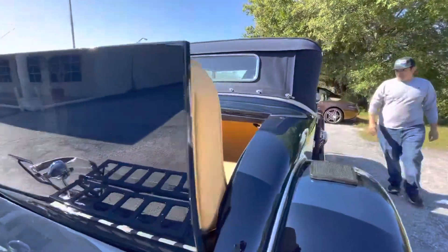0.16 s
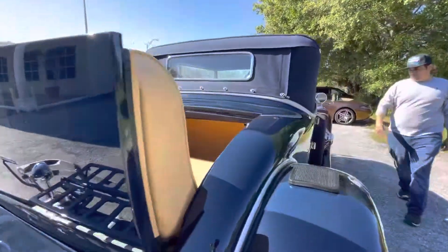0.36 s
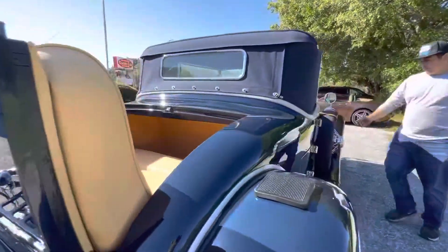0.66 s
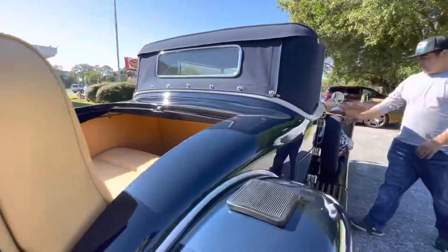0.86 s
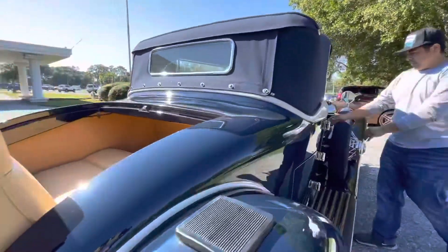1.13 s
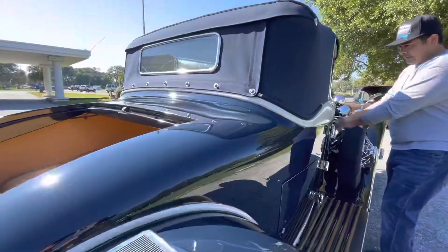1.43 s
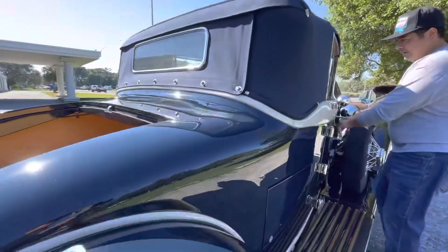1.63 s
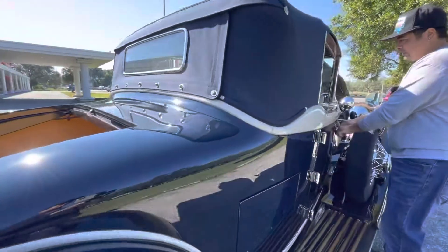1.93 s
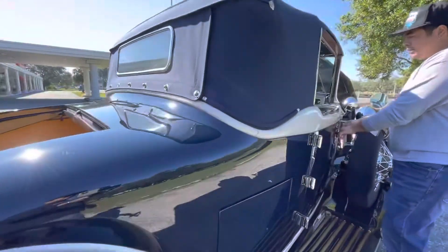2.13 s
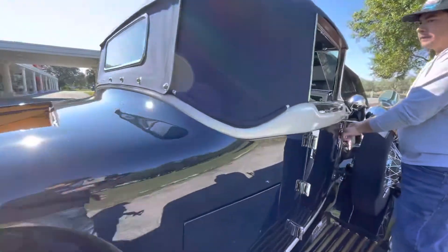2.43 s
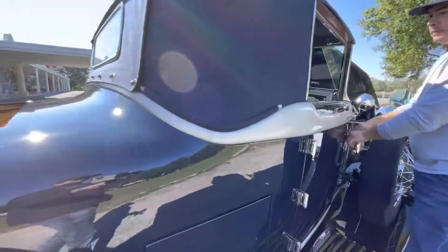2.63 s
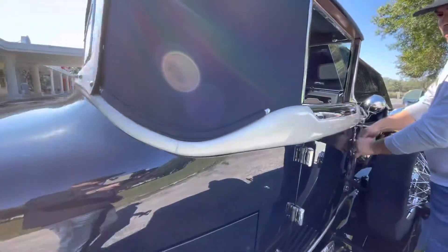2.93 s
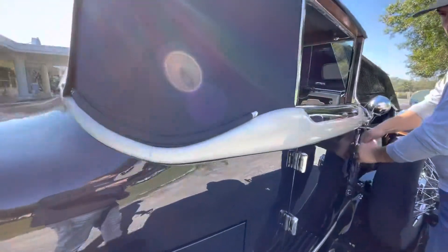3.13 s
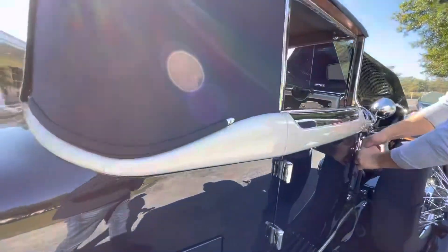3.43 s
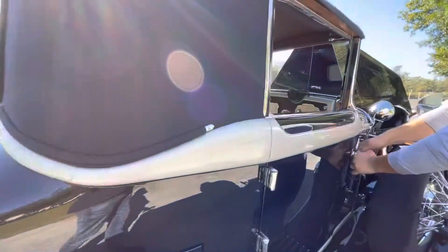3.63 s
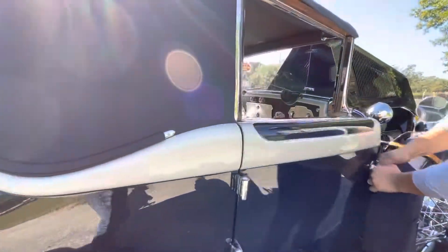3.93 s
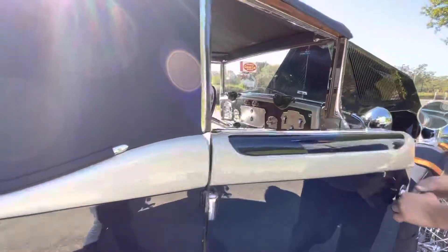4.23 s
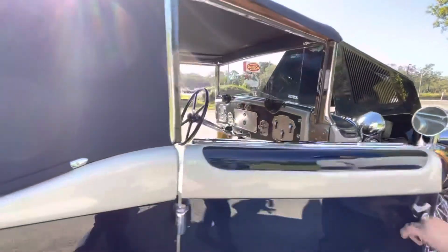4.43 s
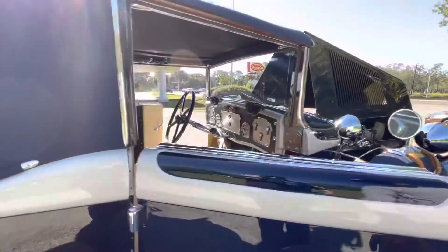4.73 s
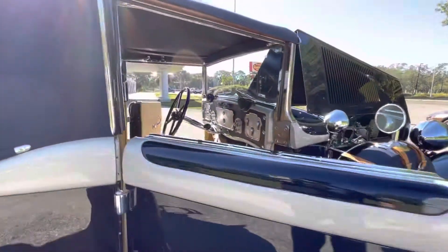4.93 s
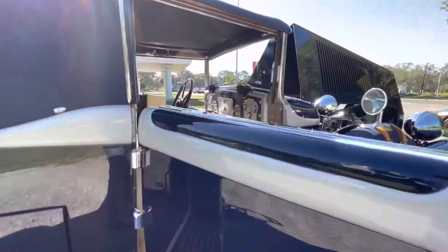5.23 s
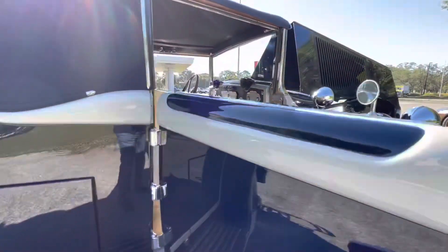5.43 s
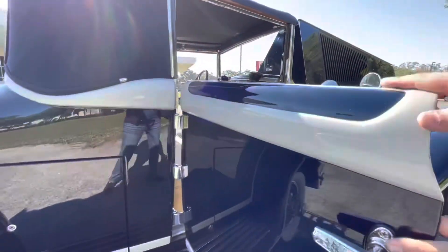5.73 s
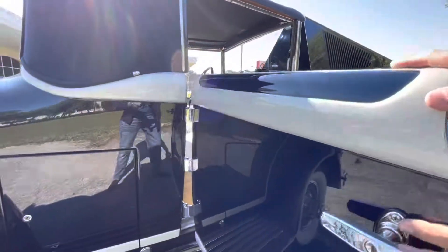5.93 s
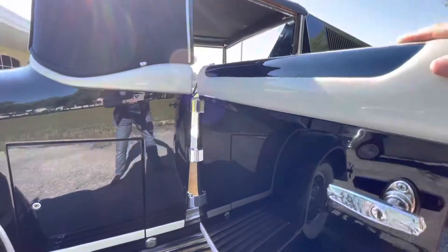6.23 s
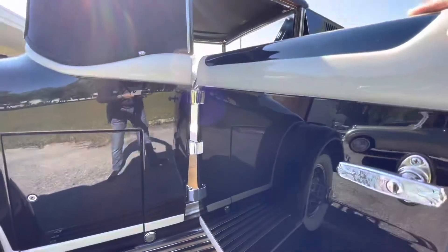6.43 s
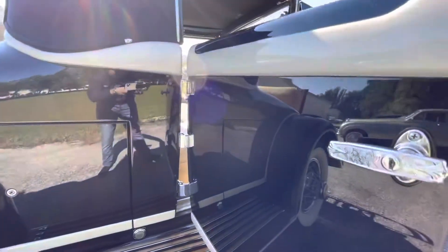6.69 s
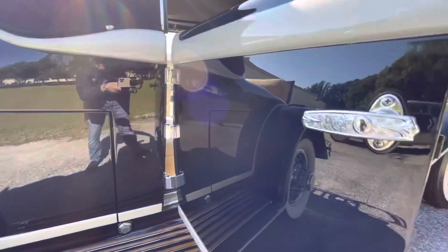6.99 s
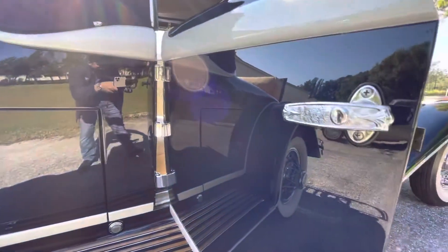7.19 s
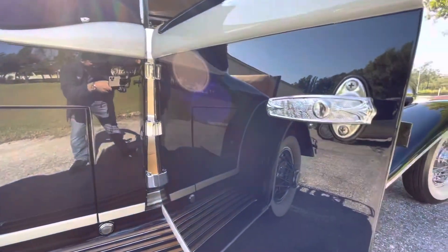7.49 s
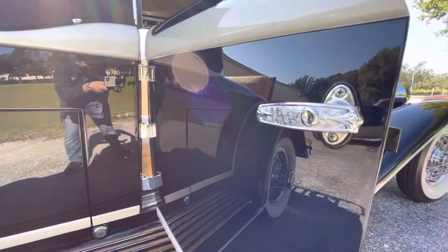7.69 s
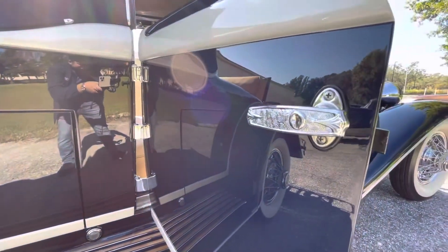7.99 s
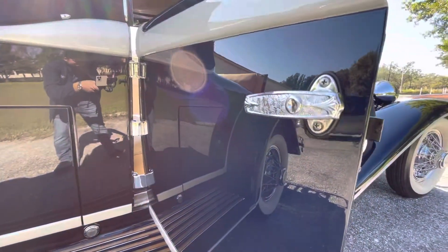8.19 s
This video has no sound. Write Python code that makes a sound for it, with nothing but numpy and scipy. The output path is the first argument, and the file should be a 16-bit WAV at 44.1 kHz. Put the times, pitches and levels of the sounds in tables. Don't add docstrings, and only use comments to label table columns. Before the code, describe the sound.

Beside a parked old car, droning engines beat slowly as sharp latch clicks, dull door knocks and gritty scuffs happen close by.

```python
import sys
import numpy as np
from scipy import signal
from scipy.fft import rfft, irfft, next_fast_len
from scipy.io import wavfile

SR = 44100
rng = np.random.default_rng(int(sys.argv[2]) if len(sys.argv) > 2 else 0)


def store_pcm(level_fs):
    pcm = np.round(np.clip(level_fs, -1, 1) * 32767).astype(np.int16)
    wavfile.write(sys.argv[1], SR, np.atleast_2d(pcm).T)


def how_loud(loudness_db):
    steps = np.asarray(loudness_db, float) / 20
    return 10 ** steps


N = 368235
PORT_LAG_S = .00034

# f/Hz, level/dB per Hz
SHEEN = [(8800, -14), (9500, -11), (10200, -4), (10800, 0), (11350, 0), (11900, -12), (12400, -24),
         (13300, -54), (16200, -70)]


def rms_one(x):
    return x / np.sqrt(np.mean(x ** 2) + 1e-20)


def in_time(rows):
    s, *columns = np.transpose(rows)
    return [np.interp(np.arange(N) / SR, s, c) for c in columns]


def drift(rate):
    r = np.exp(-80 * np.pi * rate / SR)
    draws = rng.standard_normal(N // 40 + 2002)
    slow = signal.lfilter([1], [1, -2 * r, r * r], draws)[2000:]
    return np.interp(np.arange(N) / 40, np.arange(len(slow)), rms_one(slow - slow.mean()))


def colour(x, spectrum):
    size = next_fast_len(N)
    hz, db = np.transpose(spectrum)
    log_hz = np.log(np.fft.rfftfreq(size, 1 / SR) + 1)
    gain = how_loud(np.interp(log_hz, np.log(hz), db, left=-120, right=-120))
    return irfft(rfft(x, size) * gain, size)[..., :N]


def noise(spectrum):
    return rms_one(colour(rng.standard_normal(N), spectrum))


def band_pass(x, low_hz, high_hz):
    return signal.sosfilt(signal.butter(2, [low_hz, high_hz], "band", fs=SR, output="sos"), x)


def dulled(x):
    return signal.sosfilt(signal.butter(8, 9600, fs=SR, output="sos"), x)


def ports(x, lag_s=PORT_LAG_S):
    size = next_fast_len(N + 64)
    delay = np.exp(-2j * np.pi * np.fft.rfftfreq(size, 1 / SR) * lag_s)
    late = irfft(rfft(x, size) * delay, size)[:N]
    return np.array([late, x])


def field(source, diffuse):
    share = np.clip(diffuse, 0, 1)
    return np.sqrt(1 - share) * ports(source()) + np.sqrt(share) * np.array([source(), source()])


def ring(clicks, hz, t60):
    r, w = how_loud(-60 / (t60 * SR)), 2 * np.pi * hz / SR
    return signal.lfilter([0, np.sin(w)], [1, -2 * r * np.cos(w), r * r], clicks + 1e-18)


def strike(blows, modes):
    s, db = np.transpose(blows)
    out = np.zeros(N)
    for hz, mode_db, t60 in modes:
        clicks = np.zeros(N)
        strength = how_loud(db + mode_db + rng.normal(0, 2, len(s)))
        clicks[(s * SR).astype(int)] = strength * rng.choice([-1, 1], len(s))
        out += ring(clicks, hz, t60)
    return out


def engine(rows, overtones=(), ease_db=0, flutter_db=.7, sway=.19, wander=0):
    hz, firing_db = in_time(rows)
    start, end = rows[0][0], rows[-1][0]
    fade = np.interp(np.arange(N) / SR, [start - .1, start + .1, end - .1, end + .1], [0, 1, 1, 0])
    turn = 2 * np.pi * (np.cumsum(hz) / SR + hz * PORT_LAG_S * np.array([[-.5], [.5]]))
    waves = 0
    for order, db in [(1, firing_db + ease_db), *overtones]:
        waver = drift(11.6)
        phase = order * turn + wander * waver[::-1] + sway * drift(0.84) * [[1], [-1]]
        waves = waves + how_loud(db + flutter_db * waver) * np.sin(phase)
    return np.sqrt(2) * fade * waves * how_loud([[-.35], [.35]])


def engines():
    # t/s, firing f/Hz, firing level/dB
    near = [
        (0.5, 63.2, -81),
        (0.8, 63.57, -31.5),
        (1.1, 62.53, -29.5),
        (1.75, 60, -26),
        (2.3, 59.63, -31),
        (3.5, 63.4, -31.5),
        (4.4, 65.8, -36),
        (5.0, 67.06, -45),
        (5.9, 71.35, -40),
    ]
    # t/s, firing f/Hz, firing level/dB
    second = [
        (2.3, 66.26, -62),
        (2.92, 66.8, -39.5),
        (3.54, 68.77, -35),
        (4.15, 69.9, -35),
        (4.7, 71.14, -28),
        (5.08, 71.07, -38.5),
        (5.7, 72.8, -35.5),
    ]
    # t/s, f/Hz, level/dB
    drone = [(2.8, 124.9, -49), (3.4, 128.6, -41), (4.2, 127.4, -36.5), (4.55, 127, -41), (5.2, 128.8, -35),
             (5.65, 130.4, -31), (6.2, 132, -29.5), (6.5, 134.3, -30), (6.83, 132.8, -27),
             (7.3, 134.8, -34.5), (8.35, 137, -30)]
    # t/s, f/Hz, level/dB
    shift = [
        (0.0, 149.1, -52),
        (0.4, 150, -36),
        (0.58, 142, -53),
        (0.98, 119.8, -38.5),
        (1.36, 101.9, -37),
        (1.56, 95.8, -40.5),
        (2.34, 102.3, -35.5),
        (2.85, 107.3, -71),
        (3.3, 110.4, -38),
        (3.9, 112, -56),
    ]
    # order [times firing rate], level/dB
    near_overtones = [(1.5, -44), (2, -45.5)]
    second_overtones = [(2, -44.5), (3, -63)]
    # t/s, half length/s
    drone_lifts = [
        (4.48, 0.13),
        (6.49, .1),
        (7.17, 0.14),
        (5.87, 0.038),
        (7.93, 0.034),
    ]
    # start t/s, end t/s, start
    # f/Hz, end f/Hz, top level/dB
    passes = [(5.7, 7.5, 70.5, 84.8, -36.5), (7.0, 8.6, 73, 99, -36.5), (2.47, 5.464, 67, 46.3, -43.5),
              (5.9, 7.5, 51, 47, -48.5), (5.7, 8.53, 99, 94, -45.5), (5.5, 6.5, 257, 264, -46),
              (7.9, 8.5, 271, 274, -45.5), (7.1, 8.1, 318, 326, -51.5), (7.0, 8.3, 403, 408, -54.5),
              (4.9, 5.6, 204, 214, -45.5), (0.085, 0.58, 299, 301, -54.5), (6.3, 8.2, 180, 210, -47),
              (2.45, 3.3, 198, 190, -54), (6.2, 7.9, 215, 219, -45)]
    lift_db, edge_db = -11.5, -2
    t = np.arange(N) / SR
    ease_db = sum(lift_db * np.exp(-((t - s) / half) ** 2) for s, half in drone_lifts)
    hum = engine(near, near_overtones) + engine(second, second_overtones)
    hum = hum + engine(drone, ease_db=ease_db) + engine(shift)
    for start, end, start_hz, end_hz, db in passes:
        middle = ((start + end) / 2, (start_hz + end_hz) / 2, db)
        glide = [(start, start_hz, db + edge_db), middle, (end, end_hz, db + edge_db)]
        hum = hum + engine(glide, flutter_db=3, wander=.7)
    return hum


def door():
    # t/s, bolt level/dB, panel level/dB
    latch = [
        (2.9675, -14.5, -32),
        (2.9689, -23, -25.5),
        (2.9705, -32, -22.5),
        (2.973, -33, -26.5),
        (2.9762, -37, -27.5),
        (2.981, -32, -30),
    ]
    # t/s, level/dB
    shudder = [
        (3.711, -38),
        (3.724, -30),
        (3.739, -34),
        (3.749, -33),
        (3.781, -35.5),
        (3.79, -44),
        (3.803, -37),
        (3.812, -31.5),
        (3.838, -38.5),
        (3.857, -37),
    ]
    # f/Hz, level/dB, t60/s
    bolt_modes = [(2260, -6, 0.015), (3490, -0.5, 0.015), (4600, -14, .02), (5760, -12, 0.018),
                  (6100, -14.5, .03), (7400, -20, .02)]
    panel_modes = [(353, -15, .05), (430, -5.5, 0.055), (585, -5.5, 0.046), (498, -10, 0.07),
                   (693, -1, 0.053), (885, -1, 0.035), (1185, -1.5, 0.025), (1400, -3.5, 0.026),
                   (1664, -4, .03), (2000, -3, 0.015)]
    thud_modes = [(137, 3, .08), (184, 7.5, 0.11), (215, 0, 0.12), (264, -1.5, 0.12), (371, 3, 0.091),
                  (485, 0.5, 0.051)]
    rattle_db, rattle_t60_s = -48, 0.12
    t, start = np.arange(N) / SR, latch[2][0]
    decay = how_loud(rattle_db - 60 * np.clip(t - start, 0, 1) / rattle_t60_s) * (t >= start)
    shake = rng.standard_normal((2, N)) * decay
    rattle = signal.sosfilt(signal.butter(2, 2500, fs=SR, output="sos"), shake)
    panel = sum(how_loud(db) * ring(rattle, hz, t60) for hz, db, t60 in panel_modes)
    panel = panel + how_loud(13) * band_pass(shake, 1500, 8000)
    panel_blows = [(s, db) for s, _, db in latch]
    panel = panel + [strike(panel_blows, panel_modes) for _ in range(2)]
    direct, scattered = signal.sosfilt(signal.butter(2, 260, "high", fs=SR, output="sos"), panel)
    bolt = strike([(s, db) for s, db, _ in latch], bolt_modes)
    out = ports(direct, lag_s=.0001) + 0.56 * scattered * [[-1], [1]]
    out = out + how_loud([[3.0], [-3.0]]) * ports(bolt, lag_s=.00003)
    return out + how_loud([[1.5], [-1.5]]) * ports(strike(shudder, thud_modes))


def dull_knocks(rows):
    draws, t = rng.standard_normal((len(rows), 2, 3000)), np.arange(3000) / SR
    direct, scattered = np.zeros(N), np.zeros(N)
    for (s, db, hz, t60), draw in zip(rows, draws):
        i = round(s * SR)
        rattle = how_loud(-60 * t / np.clip(t60, .01, .12)) * draw
        band = band_pass(rattle, hz / 1.45, hz * 1.45)
        burst = how_loud(db + 4.5) * band / np.abs(band).max(axis=1, keepdims=True)
        direct[i:i + 3000] += burst[0]
        scattered[i:i + 3000] += burst[1]
    return dulled(ports(direct, lag_s=.00008) + 0.5 * scattered * [[1], [-1]])


def knocks():
    # t/s, peak level/dB, centre f/Hz, t60/s
    main_knocks = [(0.145, -45, 1800, .02), (0.327, -33, 1250, 0.023), (0.639, -45, 910, 0.026),
                   (.823, -35.5, 1140, 0.05), (.832, -39, 1240, .04), (1.6805, -37.5, 2000, 0.02),
                   (1.696, -41, 2300, .02), (1.597, -41, 7000, .03), (1.618, -45, 5600, .06),
                   (.166, -38.5, 850, 0.033), (.415, -45, 1600, .02), (5.5544, -40, 2300, 0.033),
                   (5.8, -49, 2500, 0.019), (3.283, -40, 1080, 0.11), (3.711, -30, 1900, 0.08),
                   (3.732, -30, 1100, 0.064), (3.747, -27.5, 1300, 0.13), (3.784, -34, 908, 0.091),
                   (3.806, -34, 840, 0.13), (3.993, -37, 1210, 0.057), (4.96, -41.5, 1370, 0.14),
                   (5.2766, -31.5, 1350, 0.085), (5.2977, -34.5, 1940, 0.036), (5.3372, -30, 1050, 0.014),
                   (5.721, -28.5, 950, 0.028), (6.16, -41, 1790, 0.11), (6.304, -35.5, 1290, 0.073),
                   (6.342, -40, 1490, 0.02), (8.185, -39, 2900, 0.033), (8.198, -35, 2570, 0.057),
                   (6.746, -45, 2700, 0.12), (6.771, -40, 1450, 0.04), (7.235, -40, 2000, 0.03),
                   (7.3415, -45, 2550, 0.05), (7.26, -43, 2400, .04), (7.285, -44, 2500, 0.035),
                   (7.357, -42.5, 2400, 0.049), (7.391, -44, 2200, .03), (3.538, -46, 1550, 0.034),
                   (5.05, -49, 1600, .04), (5.426, -44, 1270, 0.034), (0.247, -43, 1800, .02),
                   (4.805, -52, 2100, .03), (3.726, -33, 900, .04), (3.74, -30, 800, 0.05),
                   (3.747, -30, 4200, 0.033), (3.76, -39, 1600, .03), (3.817, -39, 2000, .03),
                   (3.83, -39, 900, 0.14), (7.568, -42, 2100, .03), (8.04, -45, 2700, .05),
                   (4.965, -40, 5500, 0.14), (4.256, -39, 3200, 0.044)]
    # t/s, peak level/dB, centre f/Hz, t60/s
    brief_taps = [(.146, -42, 900, .02), (.219, -45, 1700, .02), (.219, -50, 6000, .02), (.254, -40, 1200, .02),
                  (.304, -41, 1500, .02), (.3155, -48, 6200, .02), (.372, -46, 2500, .015),
                  (.378, -45, 1500, .015), (.416, -42, 3600, .02), (3.711, -35, 3200, .025),
                  (3.731, -40, 4000, .03), (3.7465, -29, 2600, .025), (3.757, -33, 3800, .03),
                  (3.783, -40, 3497, .03), (3.802, -36, 2000, .02), (3.807, -38, 4200, .02),
                  (4.257, -43, 5000, .025), (4.259, -40, 1100, .03), (4.271, -45, 2600, .025),
                  (4.278, -39, 800, .04), (4.305, -41.5, 1500, 0.028), (5.789, -29, 2800, .04),
                  (5.815, -33, 2600, .025), (3.281, -45, 2300, .025), (7.2085, -45, 2800, .02),
                  (7.221, -43, 2600, .02), (5.288, -38, 1300, .03)]
    return dull_knocks(main_knocks) + dull_knocks(brief_taps)


def rings():
    # t/s, level/dB, f/Hz, t60/s
    parts = [(1.599, -45, 5600, 0.074), (1.619, -50, 5650, 0.08), (1.596, -39, 9400, .025),
             (5.3, -45, 2250, 0.21), (5.305, -44, 1450, .12), (5.277, -40, 5900, .04),
             (3.711, -31, 820, .05), (3.712, -30, 370, 0.087), (3.805, -38, 860, .25),
             (3.855, -36, 390, .14), (3.87, -39, 730, .08), (3.84, -44, 1400, .15), (3.993, -39, 1370, .07),
             (2.9672, -22.5, 11350, 0.036), (2.9675, -35, 8800, .03), (5.789, -29, 9700, .03),
             (5.816, -35, 8800, .03), (3.283, -43, 1220, .06), (8.198, -42, 2500, .05)]
    out, touches = np.zeros(N + SR), rng.standard_normal((len(parts), 3))
    for (s, db, hz, t60), touch in zip(parts, touches):
        clicks = np.zeros(SR // 2)
        clicks[[0, 70, 190]] = how_loud(db) * np.array([1, .4 * touch[1], .3 * touch[2]])
        out[round(s * SR):][:SR // 2] += ring(clicks, hz, t60)
    return ports(out[:N]) * how_loud([[1.0], [-1.0]])


def ticks():
    # t/s, peak level/dB
    metal = [(0.3252, -36), (1.5946, -23.5), (2.589, -37), (2.6718, -39.5), (2.7167, -37), (2.7725, -37.5),
             (2.968, -13.5), (2.655, -42), (2.83, -43), (3.2787, -26.5), (3.3543, -39), (3.3722, -32.5),
             (3.516, -36), (3.6192, -40), (3.6905, -34), (3.7105, -29), (3.7453, -11.5), (3.7828, -39),
             (3.804, -28), (4.2475, -29), (4.2852, -30), (4.8312, -26.5), (5.275, -18.5)]
    # t/s, peak level/dB
    stones = [(0.146, -42), (0.2485, -28), (0.3062, -45), (0.415, -35.5), (0.822, -35.5), (0.87, -36.5),
              (0.9467, -34), (0.9725, -32.5), (1.5337, -40), (1.503, -47), (1.524, -43), (1.731, -42),
              (3.6631, -38), (3.9928, -39), (4.3034, -30.5), (4.4493, -35), (4.803, -33.5), (4.812, -44),
              (4.82, -42), (4.848, -36), (4.972, -31), (4.9581, -28), (5.031, -36), (5.555, -43),
              (5.719, -35), (5.7759, -16.5), (5.7882, -10), (5.813, -15.5), (6.0272, -31), (6.165, -35),
              (6.305, -35.5), (6.324, -33), (6.874, -32), (7.2223, -30), (7.2347, -34), (7.3188, -30.5),
              (7.3415, -28), (7.348, -44), (7.355, -47)]
    # t/s, peak level/dB
    soles = [(0.167, -35), (0.375, -32.5), (0.5072, -41), (0.7896, -37), (1.392, -37.5), (1.617, -32.5),
             (1.6796, -43), (.197, -41), (.232, -42), (.548, -44), (.916, -38), (1.713, -33.5),
             (2.1984, -38), (2.223, -36.5), (5.049, -28), (5.1447, -35.5), (5.9793, -45), (6.1499, -40),
             (6.727, -43), (7.2085, -36), (7.567, -38), (8.0217, -46), (8.182, -40), (8.1976, -37)]
    # f/Hz, level/dB per Hz
    crack_colour = [(1500, -30), (2600, -11), (3800, -7), (5500, -4.5), (7500, -4.5), (9000, -5.5),
                    (9700, -13)]
    ring_db, ring_t60_s = -21, .004
    sheen_loss = 0.072
    crack = field(lambda: noise(crack_colour), diffuse=0.7)
    body_colour = [(900, -43.0), (1400, 7), (2200, 2.0), (3200, -30), (4000, -35)]
    body = field(lambda: noise(body_colour), diffuse=0.18)
    sheen = ports(noise(SHEEN))
    out, t = np.zeros((2, N)), np.arange(SR // 5) / SR
    burst = np.minimum(t / 0.0018, 1) * (how_loud(-60 * t / 0.021) + how_loud(-12.5 - 60 * t / 0.091))
    for rows, base_db in [(metal, -5.5), (stones, -15), (soles, -30)]:
        for s, db in rows:
            sheen_db = base_db - sheen_loss * (db + 32)
            i = round(s * SR)
            span = slice(i, i + len(t))
            panned = (crack[:, span] + how_loud(-11) * body[:, span]) * how_loud([[2.5], [-2.5]])
            low_hz, high_hz = rng.uniform([3000, 6000], [6000, 9200])
            pitches = ring(panned, low_hz, ring_t60_s) + ring(panned, high_hz, ring_t60_s)
            panned = panned + how_loud(ring_db) * pitches
            out[:, span] += how_loud(db - 12.5) * burst[:N - i] * (panned + how_loud(sheen_db + 9.5) * sheen[:, span])
    return out


def sparks():
    # t/s, level/dB
    contacts = [(2.9667, -48), (1.595, -68), (3.279, -67), (5.789, -65), (3.619, -64), (3.746, -56),
                (4.2478, -56), (4.8311, -52), (4.9579, -57), (5.275, -39), (5.337, -64), (5.718, -62),
                (6.874, -66)]
    t60_s, low_hz = 0.014, 12200
    t = np.arange(N) / SR
    shape = sum(how_loud(db - 60 * np.clip(t - s, 0, 1) / t60_s) * (t >= s) for s, db in contacts)
    top = [(low_hz - 400, -20), (low_hz, 0), (13200, -8), (15500, -10), (16200, -28)]
    return ports(shape * noise(top), lag_s=0)


def scuff():
    # t/s, level/dB
    rub = [(0.0, -71.5), (0.35, -57), (0.46, -70), (1.0, -63), (1.15, -75), (1.7, -63), (1.85, -79),
           (2.3, -74), (2.86, -68.5), (3.14, -70), (3.56, -65.5), (4.74, -65.5), (5.24, -63), (5.31, -58),
           (5.46, -53), (6.3, -61.5), (7.37, -60.5), (7.5, -67), (8.0, -64.5), (8.35, -69)]
    # start t/s, length/s, level/dB, sheen level/dB relative to the scrape
    scrapes = [(2.601, 0.28, -84, 15), (4.303, 0.28, -64, -5), (0.307, 0.048, -52.5, -9),
               (3.352, 0.017, -51, 8), (3.383, 0.043, -48.5, 6.5), (3.47, 0.014, -54, 11.5),
               (3.699, 0.11, -44.5, -2), (4.248, 0.042, -49, -4), (4.796, .05, -60, -12),
               (5.297, 0.17, -47.5, -12), (6.728, 0.052, -52, -8), (7.215, 0.043, -50, -6),
               (7.297, 0.062, -52, -4), (6.142, 0.053, -54, -15)]
    # f/Hz, level/dB per Hz
    grit_colour = [(1500, -11), (2500, -5.5), (4000, -6.5), (5500, -4.5), (7500, -5), (9000, -8.5),
                   (9600, -11)]
    scuff_sheen_db, turn_away_s, dulling_db_per_s = -7.5, 5.2, -5
    clump, t = drift(30), np.arange(N) / SR

    def grains(spectrum):
        born = rng.random(N) < 6000 * how_loud(3 * clump) / SR
        strength = how_loud(1.9 * np.minimum(rng.exponential(1, N), 4))
        return rms_one(colour(born * strength * rng.choice([-1, 1], N), spectrum))

    grit = how_loud(in_time(rub)[0])
    sheen = grit * how_loud(scuff_sheen_db + dulling_db_per_s * np.maximum(t - turn_away_s, 0))
    for start, length, db, sheen_db in scrapes:
        end = start + length
        corners = [start - .003, start + 0.0028, end, start + 1.33 * length, start + 1.814 * length]
        stroke = np.interp(t, corners, [0.0, 0.44, 0.5, 0.11, 0])
        grit = grit + how_loud(db) * stroke
        sheen = sheen + how_loud(db + sheen_db) * stroke
    uneven = how_loud(1.5 * clump)
    wide_grit = grit * how_loud([[2.1], [-2.1]]) * field(lambda: grains(grit_colour), diffuse=1.0)
    return uneven * (wide_grit + sheen * ports(grains(SHEEN)))


def puffs():
    # t/s, f/Hz, length/s, level/dB
    swells = [
        (4.1, 54, 0.057, -25),
        (5.8, 72, 0.082, -29),
        (8.02, 69, 0.16, -31.5),
        (7.7, 140, 0.13, -53),
        (2.4, 170, 0.031, -44),
        (5.4, 72, 0.066, -19.5),
        (1.67, 175, .04, -41),
        (1.67, 220, .04, -43),
        (3.29, 390, 0.025, -36.5),
    ]
    t = np.arange(N) / SR
    out = 0
    for s, hz, length, db in swells:
        out = out + how_loud(db + 0.5) * np.exp(-(2 * (t - s) / length) ** 2) * np.sin(2 * np.pi * hz * t)
    return ports(out)


def whines(rows):
    whine, white, t = 0, rng.standard_normal(N), np.arange(N) / SR
    white = ports(white) + 0.73 * white[::-1] * [[1], [-1]]
    for start, end, hz, width, db in rows:
        band = band_pass(white, hz - width / 2, hz + width / 2)
        swell = np.sin(np.pi * np.clip((t - start) / (end - start), 0, 1)) ** .5
        whine = whine + how_loud(db + 2.0 * drift(3.6)) * swell * rms_one(band)
    return dulled(whine)


def strands():
    # start t/s, end t/s, f/Hz, width/Hz, level/dB
    narrow = [(3.15, 3.6, 1420, 70, -58), (4.4, 4.9, 815, 30, -53), (3.25, 3.65, 880, 60, -52),
              (2.4, 2.85, 790, 45, -53), (4.2, 4.75, 450, 35, -51), (5, 5.5, 520, 30, -50),
              (5.2, 5.8, 700, 35, -51), (6.2, 7.44, 740, 43, -54.5), (4.15, 4.45, 1150, 300, -54),
              (7.6, 8.3, 500, 40, -55), (1.95, 2.36, 660, 50, -53.5), (2.4, 2.9, 440, 43, -51.5)]
    return whines(narrow)


def patchy(x, patch_db=1.1):
    out = x
    for low in 250 * 2 ** np.arange(0, 4, .5):
        band = band_pass(x, low, low * np.sqrt(2))
        out = out + (how_loud(patch_db * drift(5.0)) - 1) * band
    return out


def road():
    # t/s, swell level/dB
    nearness = [
        (0.0, 0),
        (0.8, -2.5),
        (1.67, -1.5),
        (2.74, 0),
        (4.86, 1),
        (5.45, 5),
        (6.09, 0.5),
        (7.7, 2),
        (8.35, 4.5),
    ]
    # f/Hz, level/dB per Hz
    rumble = [(28, -38), (42, 1.5), (60, 7), (100, 8), (150, 6), (200, -9), (260, -47)]
    roar = [(88, -28.5), (150, -7), (178, -6.5), (284, -10), (360, -14.5), (518, -14.5), (655, -18.5),
            (750, -14), (980, -21.5), (1650, -120)]
    upper = [(380, -10.5), (650, -5), (712, -15), (956, -4), (1390, -3.5), (1670, -9.5), (2290, -17.5),
             (3530, -28), (4530, -25), (5810, -35.5), (8550, -40), (9600, -43), (9900, -52), (10800, -52),
             (11400, -53), (11900, -63), (12300, -100), (21600, -120)]
    # level/dB, share of the swell [0 to about 1]
    layers = [(-39.5, 1), (-43, 1.0), (-48, 0.51)]
    # start t/s, end t/s, f/Hz, width/Hz, level/dB
    noise_bands = [(2, 2.92, 720, 220, -50), (3, 5.23, 466, 93, -46.5), (4, 5.226, 815, 120, -46.5),
                   (5, 6.09, 531, 77, -43.5), (5, 5.9, 680, 144, -42), (5.5, 8.4, 759, 86, -50.5),
                   (1.6, 2.1, 680, 200, -52), (6.8, 8.37, 2300, 790, -58.5), (5.5, 5.62, 3000, 1600, -61),
                   (7, 8.9, 288, 81, -48), (0, 1.1, 1970, 650, -55.5), (3, 4.1, 1336, 430, -60),
                   (6.85, 7.22, 6500, 1500, -65),
        (6.92, 7.15, 8500, 1000, -68),
    ]
    out = 0
    swell_db, = in_time(nearness)
    diffuses, lefts_db = (.15, .55, .55), (0, 0, .8)
    for (db, share), spectrum, diffuse, left_db in zip(layers, (rumble, roar, upper), diffuses, lefts_db):
        level_db = db + share * swell_db + 1.24 * drift(10.6) + left_db * np.array([[1], [-1]])
        out = out + how_loud(level_db) * field(lambda: noise(spectrum), diffuse)
    return patchy(out + whines(noise_bands))


def scene():
    car = engines() + door() + knocks() + rings()
    close = ticks() + sparks() + scuff() + puffs()
    return car + close + strands() + road()


def roll_off(x):
    return signal.sosfilt(signal.butter(12, 16620, fs=SR, output="sos"), x)


def record(dry):
    cut = signal.sosfilt(signal.cheby2(10, 60, 16400, fs=SR, output="sos"), dry)
    return roll_off(cut)


dry = scene()
out = record(dry)
store_pcm(out)
```